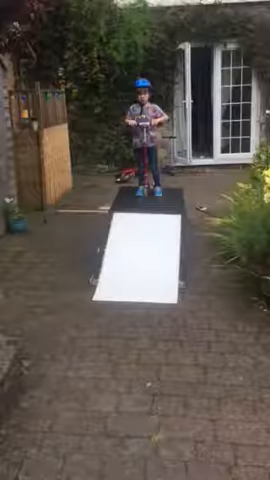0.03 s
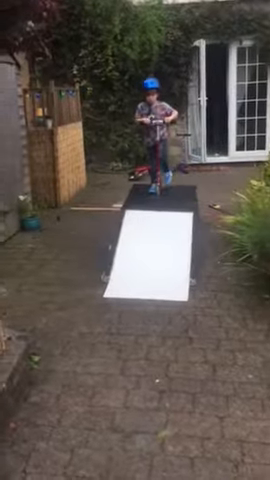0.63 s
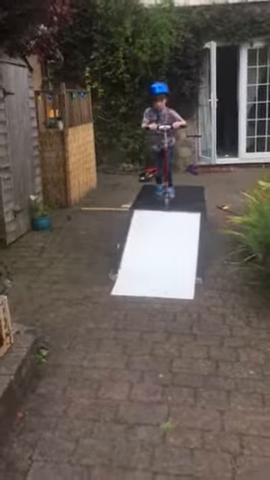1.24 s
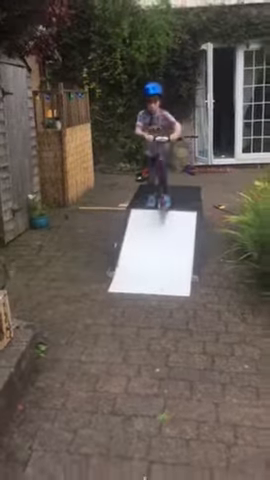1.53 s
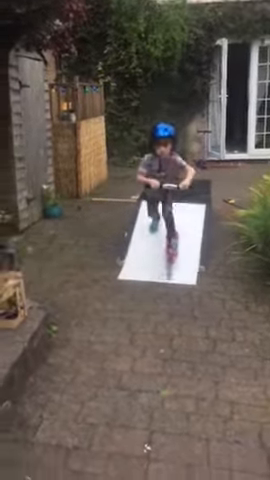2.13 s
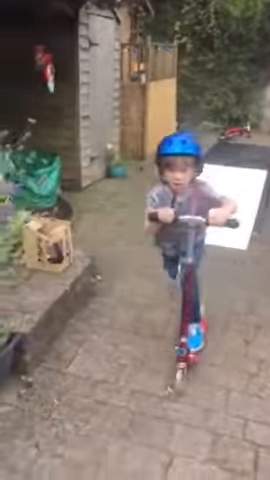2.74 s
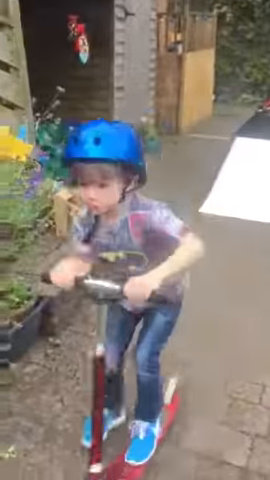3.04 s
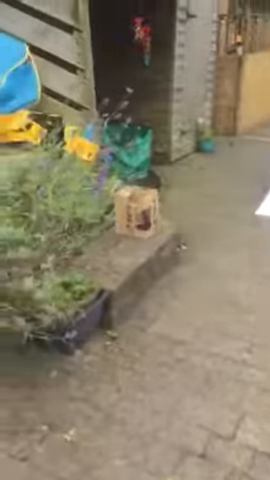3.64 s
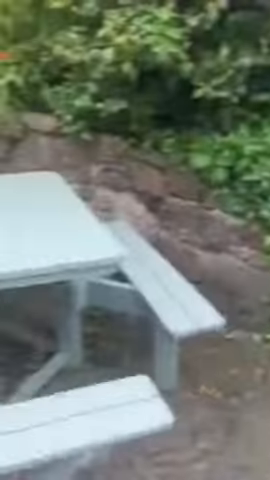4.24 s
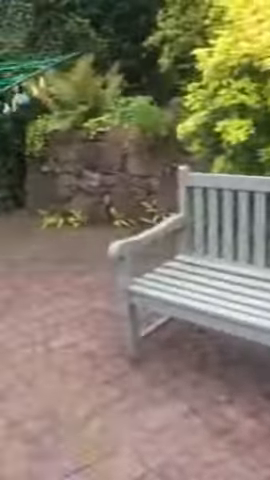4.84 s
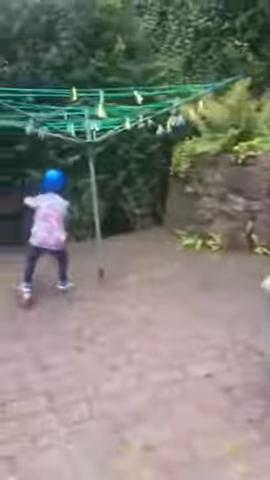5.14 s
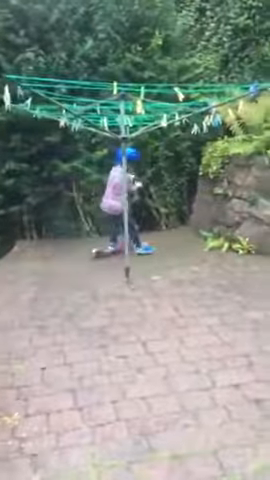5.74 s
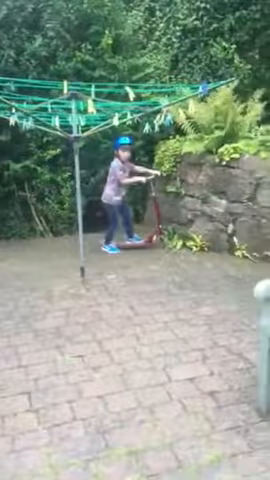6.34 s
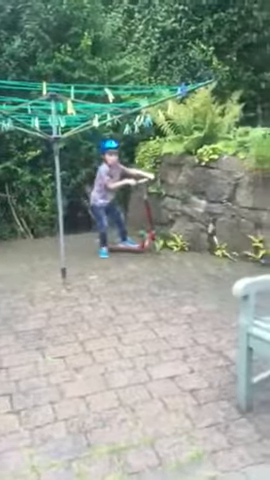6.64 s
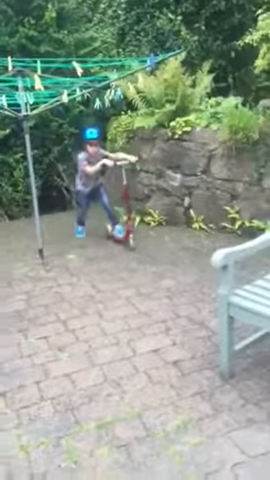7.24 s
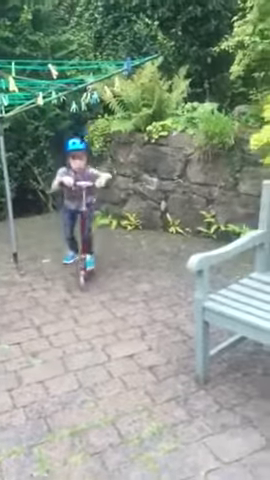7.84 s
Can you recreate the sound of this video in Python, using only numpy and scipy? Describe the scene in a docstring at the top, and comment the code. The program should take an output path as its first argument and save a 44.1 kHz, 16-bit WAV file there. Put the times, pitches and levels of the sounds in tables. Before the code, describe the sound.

A soft low thump opens over a light outdoor wind rumble. Around 1 second a kick scooter starts moving with faint shoe scuffs and a metallic clink. From about 1.5 to 2.3 seconds its wheels knock and boom on a hollow plywood ramp, hardest at 2 seconds. It then runs onto brick paving, clacking over the joints, its steel frame rattling and small hard wheels rumbling and crunching on grit. The clatter is loudest around 3.3 seconds, close to the microphone, then recedes with a scrape and dull deck thumps. A faint low hum rises and sinks from about 4.5 to 7 seconds. Near 6 seconds the scooter slows and turns with a soft skid and scuffs, almost going quiet. From about 7 seconds it sets off again with light clinks and a few rattling bumps until 8 seconds.

```python
"""A child's kick scooter rolls off a hollow plywood ramp, clatters close past over brick paving, turns
and sets off again. Each joint jolts the hollow deck and rattles the loose steel frame; the small hard
wheels rumble and crunch on grit, louder with speed and nearness. The steering tube and brake clink,
a shoe scuffs and the tread scrapes in the turns. Garden walls answer, a light wind and a low hum lie
underneath, and a soft low thump opens the scene."""
import sys
import numpy as np
from scipy import signal
from scipy.fft import rfft, irfft
from scipy.io import wavfile
from scipy.ndimage import uniform_filter1d, map_coordinates

SR = 44100
rng = np.random.default_rng(int(sys.argv[2]) if len(sys.argv) > 2 else 0)


def transcribe(signal):
    """Save signal, clipped to [-1, 1], as a 16-bit WAV file at the path in sys.argv[1]."""
    frames = np.atleast_2d(signal).T
    limited = np.clip(frames, -1, 1)
    pcm = np.round(limited * 32767).astype(np.int16)
    wavfile.write(sys.argv[1], SR, pcm)


N = 356769

# the scooter's path: (time [s], speed [m/s], distance from the listener [m])
RIDE = [(.7, 0.23, 6.8), (1.15, 1.1, 5.3), (1.37, 0.53, 6), (1.55, 2.86, 2.9), (2.199, 1.84, 2.8),
        (2.42, 3.03, 2.9), (3.05, 3.27, 1.34), (3.3, 1.7, 0.9), (3.549, 3.3, 1.68), (3.851, 2.7, 1.45),
        (4.5, 3.43, 2.48), (4.801, 2.3, 3.64), (5.3, 1.9, 3.9), (5.9, 1.15, 4.4), (6.7, 0.38, 3.17),
        (7.2, 0.99, 5.6), (7.58, 0.55, 4.3), (8.09, 0.95, 3.16)]
# wheels striking deep joints, and from about 5.1 s on, pushes of the foot jolting the frame: (time [s], clack
# [dB], rattle [dB], thud [dB])
HARD_JOLTS = [(2.307, -48, -47.5, -32.5), (2.424, -62, -46.5, -41), (2.509, -31.5, -35, -36.5),
              (2.682, -41, -44, -41.5), (2.798, -39, -41.5, -38.5), (2.838, -28.5, -31.5, -36.5),
              (2.883, -27.5, -32.5, -27.5), (2.942, -32, -34, -48), (3.082, -32, -37, -32),
              (3.127, -36.5, -36.5, -30.5), (3.171, -38.5, -38.5, -36.5), (3.224, -34.5, -35.5, -36),
              (3.251, -26, -28.5, -26.5), (3.302, -17.5, -23.5, -29.5), (3.317, -26, -39.5, -46),
              (3.35, -18, -22, -33), (3.393, -27.5, -31, -35), (3.443, -21.5, -25.0, -27),
              (3.547, -39.5, -42.5, -37.5), (3.654, -29, -35.5, -32), (3.743, -36, -40.0, -34.5),
              (3.789, -33, -45.5, -34), (3.932, -33.5, -41, -31), (4.096, -37.5, -57, -53),
              (4.132, -36, -44, -32), (4.236, -38.5, -45.5, -39), (4.284, -30.5, -38.5, -39),
              (4.4, -32.5, -46.5, -42), (4.491, -44, -43.5, -35), (4.509, -39, -43.5, -36),
              (4.597, -37, -44.5, -39), (4.666, -33, -39, -30.5), (4.803, -51, -53, -43),
              (4.917, -45, -45.5, -37), (5.142, -52, -53.5, -32.5), (5.388, -52, -50, -39.5),
              (5.728, -43.0, -44.5, -39.5), (5.936, -49, -51.5, -43), (6.018, -41.0, -44.5, -38.5),
              (6.644, -55, -56, -51), (7.824, -45.5, -47.5, -44), (8.003, -48, -50, -42)]
# blows on the ramp: (time [s], relative knock [dB], relative boom [dB], knock low-pass [Hz])
RAMP_HITS = [(1.473, -29.5, -37, 1270), (1.507, -24, -42, 1770), (1.533, -20, -40, 4870),
             (1.641, -27, -30, 900), (1.657, -22.5, -27, 2000), (1.78, -29, -48, 1700),
             (1.941, -26, -72, 1900), (2.032, -28, -48, 2000), (2.039, -12.5, -23, 3930),
             (2.331, -24, -20.5, 920)]
# dull thumps of the deck: (time [s], level [dB])
DECK_THUMPS = [(1.015, -50), (1.128, -46.5), (1.42, -39.5), (3.593, -31.5), (3.985, -32), (4.035, -42),
               (4.33, -34), (4.435, -38), (4.546, -37), (4.746, -37.5), (4.961, -36), (5.272, -34.5),
               (5.605, -36.5), (7.642, -47.5), (7.843, -45)]
# knocks of the steering tube: (time [s], relative level [dB], low-pass [Hz])
STEERING_KNOCKS = [(1.236, -28.5, 7500), (4.882, -23, 750), (7.203, -36.5, 1920), (7.765, -28.5, 7000)]
# clinks of the loose brake: (time [s], level [dB])
BRAKE_CLINKS = [(1.61, -60), (1.71, -53), (5.04, -57.5), (5.574, -55), (5.844, -52), (6.165, -55),
                (6.799, -58.5), (7.091, -52), (7.308, -59.5), (7.435, -57), (7.718, -53), (7.806, -46),
                (7.873, -51.5)]
# shoe soles dragging: (time [s], relative level [dB], length [s])
SCUFFS = [(0.777, -67, 0.15), (1.25, -58, 0.088), (1.501, -56, 0.13), (1.918, -48.5, 0.057),
          (4.098, -40.5, 0.031), (5.099, -57, 0.39), (4.938, -49.5, 0.067), (5.681, -53.5, 0.12),
          (6.322, -70.5, 0.39), (7.79, -65.5, 0.31)]
# wheels slipping sideways: (time [s], level [dB], length [s])
SKIDS = [(3.6, -43.5, 0.7), (5.761, -52, .42)]
# a low hum that rises and sinks: (time [s], pitch [Hz], level [dB])
HUM = [(4.3, 102, -90), (4.58, 106, -39), (5.15, 122, -44.5), (6.25, 130, -55.5), (6.68, 120, -47),
       (7.6, 100, -69)]
# the garden's reverb: (frequency [Hz], time to fall 60 dB [s])
GARDEN_DECAY = [(150, 0.35), (800, 0.11), (3000, 0.097), (14000, 0.14)]

# resonances of each part: (frequency [Hz], width [Hz], relative level [dB])
FRAME_MODES = [(946, 360, -4), (1320, 100, -11), (1527, 42, 0.5), (2026, 170, -11), (2710, 26, -8),
               (3230, 150, -8), (4075, 62, 0), (4565, 100, -2.5), (9140, 150, -6)]
DECK_MODES = [(105, 22, -2.5), (175, 24, 0)]
WHEEL_MODES = [(952, 90, -2), (1460, 120, -8.5), (2037, 200, -5.5), (3180, 960, -10.5)]
PLYWOOD_MODES = [(287.7, 14, 3), (540, 58, -12), (662, 30, 4.5), (2100, 160, 0.5)]
TUBE_MODES = [(1530, 240, 2), (2150, 70, -3), (3290, 74, 1), (6010, 80, 6.5)]
BRAKE_MODES = [(2700, 47, -6), (3400, 49, -2.5), (6630, 120, -2.5)]

# broad tone colour of each sound: (frequency [Hz], relative level [dB])
CLACK_EQ = [(150, -12), (400, -1.5), (680, -11), (900, 1.5), (1600, 1.5), (3300, 3.5), (4500, -11),
            (5400, -20.5), (9000, -24)]
RATTLE_EQ = [(2500, -19), (4900, -3.5), (6400, 6), (7600, -3.5), (8700, -1.5), (10400, -4), (15000, -2.5),
             (17500, -10)]
DECK_EQ = [(25, -51.5), (50, -17.5), (80, -3), (130, -3), (230, -2), (320, -9), (480, -19.5), (1000, -36.5),
           (5000, -71.5)]
TREAD_EQ = [(200, -6.5), (400, 0.5), (680, -3), (950, -5.5), (1300, 4.5), (2200, -1.5), (3400, -3),
            (5000, -16), (9000, -32.5)]
PLYWOOD_EQ = [(90, -18.5), (190, 2), (290, -0.5), (420, -9), (800, -12.5), (1400, -15), (3000, -24.5),
              (5500, -30.5), (9000, -65)]
BOOM_EQ = [(25, -65), (55, -5.5), (90, 5.5), (125, -1.5), (200, 2), (500, -49.5), (4000, -103)]
TUBE_EQ = [(150, 2), (600, 0.5), (1500, 0.5), (3700, -0.5), (4900, -11.5), (6500, -2), (7400, -16),
           (16000, 0.5)]
CLINK_EQ = [(700, -9.5), (2600, 2), (17000, -9)]
SOLE_EQ = [(250, -12.5), (650, 10.5), (1050, -3), (1400, 2), (2700, -2), (6500, -11), (16000, -25)]
WIND_EQ = [(20, -30), (50, 0.5), (90, -2), (280, -9), (450, -18), (800, -12), (1670, -23.5), (5000, -31.5),
           (17000, -38)]

# level laws: (level at 1 m/s and 1 m [dB], gain per tenfold speed [dB], loss per tenfold distance [dB])
RUMBLE_LAW, TREAD_LAW, RING_LAW = (-50, 26, 5.3), (-44, 14.7, 34), (-43, 15, 43.6)
GRIT_LAW, SEAM_LAW, CRACKLE_LAW = (-52, 20, 29.7), (-40, 17, 25), (-59, 32, 29)
RAMP_END_S = 2.3  # the wheels leave the plywood for the brick
TIME = np.arange(N) / SR


def hard_jolts():
    """A wheel drops into a joint, or a push of the foot jolts the frame: the frame clacks, loose steel rattles
    and the hollow deck thuds."""
    out = np.zeros(N)
    for s, clack_db, rattle_db, thud_db in HARD_JOLTS:
        _, metres = ride(s)
        chatter_s = .0019 + .0011 * metres  # scattering over the paving draws out distant blows
        shaded_eq = [(hz, db + leg_shadow(s) * (hz > 7300)) for hz, db in RATTLE_EQ]
        frame = body(CLACK_EQ, varied(FRAME_MODES, scatter_db=4), ring_db=11.5)
        steel = body(shaded_eq, varied(FRAME_MODES, scatter_db=3), ring_db=11)
        deck = body(DECK_EQ, varied(DECK_MODES, scatter_db=4, detune=.06))
        clack = blow(frame, chatter_s, settle_db=3.5, settle_s=.01, spread_db=5)
        rattle = blow(steel, chatter_s, settle_db=7, settle_s=.013, spread_db=6)
        thud = blow(deck, chatter_s=.0035, settle_db=-17, settle_s=.023, spread_db=1)
        add(out, s, amp(clack_db) * clack + amp(rattle_db) * rattle + amp(thud_db) * thud)
    return out


def seam_hits(brick_m=.21, scatter_m=.015, scatter_db=4.5):
    """One shallow joint per brick travelled, where no deep one falls: (time [s], level [dB])."""
    t = TIME[round(RAMP_END_S * SR):]
    speed, _ = ride(t)
    travel_m = np.cumsum(speed) / SR
    offset, depth = rng.standard_normal((120, 2)).T
    seam_m = brick_m * np.arange(1, len(offset) + 1) + scatter_m * offset
    deep_m = np.interp(np.transpose(HARD_JOLTS)[0], t, travel_m)
    gap_m = np.abs(seam_m[:, None] - deep_m).min(axis=1)
    struck = (gap_m > brick_m / 2) & (seam_m < travel_m[-1])
    times = np.interp(seam_m, travel_m, t)
    levels = loudness(SEAM_LAW, times) + scatter_db * depth
    return zip(times[struck], levels[struck])


def shallow_joints():
    """The shallow joints keep frame, wheels and deck pattering between the deep ones."""
    jolts = np.zeros(N)
    for s, db in seam_hits():
        add(jolts, s, amp([db]))
    shaking = through(jolts, np.exp(-TIME[:SR // 10] / .0023)) * grains(N, spread_db=7.5)
    wheel = body(CLACK_EQ, WHEEL_MODES, ring_db=13.5)
    steel = body(RATTLE_EQ, FRAME_MODES, ring_db=10)
    return through(shaking, wheel + amp(-24) * steel + amp(3) * body(DECK_EQ))


def rolling():
    """Rough brick shakes the deck, roars in the tread, rings the wheel and crunches with grit."""
    bumps = amp(2.5 * wobble(55))
    pebbles = ticks(rate=300, spread_db=4, fade_s=.002)
    knocks = ticks(rate=30, spread_db=2.5, fade_s=.012)
    speed, _ = ride(TIME)
    hopping = np.clip(speed / 3, 0, 1)  # slow wheels stay down, fast ones hop
    shaking = (1 - hopping + hopping * knocks) * rng.standard_normal(N)
    rumble = unit(through(shaking, body(DECK_EQ, DECK_MODES)))
    contact = np.sqrt(bumps) * (2 + pebbles) * grains(N, spread_db=3.5)
    tread = through(contact, body(TREAD_EQ, WHEEL_MODES[1:], ring_db=7.5))
    crunch = amp(4.5 * wobble(22)) * (1 + pebbles) * grains(N, spread_db=7)
    grit = through(crunch, body(RATTLE_EQ, FRAME_MODES, ring_db=-7.5))
    ring = wheel_ring(bumps * grains(N, spread_db=3.5))
    tread, grit = patchy(tread, depth_db=3.5), patchy(grit, depth_db=4)
    on_ramp = TIME < RAMP_END_S  # plywood is smoother, so it rolls more quietly
    rumble *= amp(loudness(RUMBLE_LAW, TIME) - 1.5 * on_ramp)
    tread *= amp(loudness(TREAD_LAW, TIME) - 4 * on_ramp)
    ring *= amp(loudness(RING_LAW, TIME))
    grit *= amp(loudness(GRIT_LAW, TIME) - 10.5 * on_ramp + leg_shadow(TIME))
    return rumble + tread + ring + grit


def wheel_ring(shaking):
    """The wheel's lowest resonance, a hollow ring whose pitch wanders with the load on it; rms 1."""
    hz, width, _ = min(WHEEL_MODES)
    swell = through(shaking, np.exp(-np.pi * width * TIME[:SR // 20]))
    pitch_hz = hz * (1 + .04 * wobble(11))
    return unit(swell * np.sin(2 * np.pi * np.cumsum(pitch_hz) / SR))


def ramp():
    """Wheels and feet knock on the plywood; the hollow booms and the frame rattles faintly just after."""
    out, hollow, steel = np.zeros(N), body(BOOM_EQ), body(RATTLE_EQ, FRAME_MODES, ring_db=13.5)
    for s, knock_db, boom_db, cutoff_hz in RAMP_HITS:
        board = body(PLYWOOD_EQ, varied(PLYWOOD_MODES, scatter_db=2), ring_db=4)
        knock = blow(dulled(board, cutoff_hz), chatter_s=.0012, settle_db=-3.5, settle_s=.025, spread_db=2)
        boom = blow(hollow, chatter_s=.0041, settle_db=-8.5, settle_s=.024, spread_db=-.5)
        rattle = blow(steel, chatter_s=.006, settle_db=-8, settle_s=.02, spread_db=4)
        add(out, s, amp(knock_db - 10) * knock + amp(boom_db - 5) * boom)
        add(out, s + .012, amp(-59) * rattle)
    return out


def deck_thumps():
    """The deck thumps dully as the rider's weight lands or a wheel sinks into a worn joint."""
    out, deck = np.zeros(N), body(DECK_EQ, DECK_MODES)
    for s, db in DECK_THUMPS:
        add(out, s, amp(db) * blow(deck, chatter_s=.004, settle_db=-3, settle_s=.012, spread_db=3))
    return out


def steering_knocks():
    """The steering tube knocks in its play as the rider pulls the bar: dull clunks and bright clinks."""
    out = np.zeros(N)
    for s, db, cutoff_hz in STEERING_KNOCKS:
        tube = dulled(body(TUBE_EQ, varied(TUBE_MODES, scatter_db=3), ring_db=11), cutoff_hz)
        knock = blow(tube, chatter_s=.0012, settle_db=9, settle_s=.0076, spread_db=10.5)
        add(out, s, amp(db - 13) * knock)
    return out


def brake_clinks():
    """The thin, loose brake blade chatters on its hinge and rings briefly."""
    out = np.zeros(N)
    for s, db in BRAKE_CLINKS:
        blade = body(CLINK_EQ, varied(BRAKE_MODES, scatter_db=3), ring_db=16)
        add(out, s, amp(db) * blow(blade, chatter_s=.0027, settle_db=1, settle_s=.018, spread_db=10.5))
    return out


def grit_crackle():
    """Single grains burst between brick and hard wheel: sharp, dry ticks at uneven moments."""
    pops = ticks(rate=70, spread_db=4.5, fade_s=.0006) * rng.standard_normal(N)
    level_db = loudness(CRACKLE_LAW, TIME) + leg_shadow(TIME)
    return amp(level_db) * (TIME > RAMP_END_S) * through(pops, body(CLINK_EQ))


def skids():
    """The tread scrapes sideways in a tight turn and softly rings the wheel."""
    out = np.zeros(N)
    for s, db, length_s in SKIDS:
        stroke = np.hanning(int(length_s * SR))
        add(out, s, amp(db) * stroke * grains(len(stroke), spread_db=4))
    grip = unit(amp(4 * wobble(20)))
    return through(out * grip, body(TREAD_EQ, WHEEL_MODES[1:3], ring_db=19))


def shoe_scuffs():
    """The pushing foot drags: a swell of tiny slips in the sole, with grit crunching under it."""
    out = np.zeros(N)
    for s, db, length_s in SCUFFS:
        stroke = np.sqrt(np.hanning(int(length_s * SR)))
        add(out, s, amp(db) * stroke * grains(len(stroke), spread_db=5.5))
    grip = amp(2.8 * wobble(90))
    grit = body(RATTLE_EQ, FRAME_MODES, ring_db=18.5)
    return through(out * grip, amp(3.5) * body(SOLE_EQ) + amp(-20.5) * grit)


def garden_reverb(x, predelay_s=.012):
    """Walls and hedges scatter a short tail that lingers longest in the bass."""
    hz, t, noise = signal.stft(rng.standard_normal(SR // 2), SR, nperseg=256)
    decay = amp(-60 * t / along(GARDEN_DECAY, hz)[:, None])
    tail = signal.istft(noise * decay, SR, nperseg=256)[1]
    return through(x, np.pad(tail / np.linalg.norm(tail), (int(predelay_s * SR), 0)))


def wind():
    """A bed of light wind and distant outdoor noise, swelling gently."""
    gusts = amp(wobble(1.8))
    return amp(-62) * gusts * through(rng.standard_normal(N), body(WIND_EQ))


def hum():
    """A low hum rises and sinks, fluttering more deeply while the scooter runs fast."""
    hum_hz, hum_db = curves(HUM, TIME)
    speed, _ = ride(TIME)
    dip_db = np.abs(3 * speed * wobble(20))
    phase = 2 * np.pi * np.cumsum(hum_hz + wobble(7.9)) / SR
    return amp(hum_db - dip_db) * np.sqrt(2) * np.sin(phase)


def opening_thump():
    """A soft low thump and a brief rustle as the sound cuts in."""
    out = np.zeros(N)
    thump = blow(body(BOOM_EQ), chatter_s=.003, settle_db=-14, settle_s=.012, spread_db=3)
    rustle = blow(body(SOLE_EQ), chatter_s=.001, settle_db=-5, settle_s=.025, spread_db=3)
    add(out, .083, amp(-43.5) * thump + amp(-53) * rustle)
    return out


def ride(s):
    """The scooter's speed [m/s] and distance [m] at time s."""
    return curves(RIDE, s)


def loudness(law, s):
    """Level [dB] at time s: faster is louder, farther is fainter."""
    db, per_speed, per_distance = law
    speed, metres = ride(s)
    return db + per_speed * np.log10(speed) - per_distance * np.log10(metres)


def leg_shadow(s, start_s=3.78, end_s=4.15, ease_s=.13):
    """Dip [dB] in grit and top-end rattle as the rider's legs hide the departing frame."""
    return -9.5 * np.clip(np.minimum(s - start_s, end_s - s) / ease_s, 0, 1)


def body(eq, modes=(), ring_db=0, size=8192):
    """Impulse response of energy 1: a broad tone colour with resonances standing out of it."""
    hz = np.fft.rfftfreq(size, 1 / SR)
    peaks = sum(amp(db + ring_db) ** 2 / (1 + (2 * (hz - f) / width) ** 2) for f, width, db in modes)
    magnitude = amp(along(eq, hz)) * np.sqrt(1 + peaks)
    cepstrum = irfft(np.log(magnitude))
    response = irfft(np.exp(rfft(2 * cepstrum[:size // 2], size)))  # minimum phase: a tight attack
    return response / np.linalg.norm(response)


def varied(modes, scatter_db, detune=.016):
    """Each blow lands elsewhere on a part under changing load: new strengths, slightly new pitches."""
    chance = rng.standard_normal((len(modes), 2))
    return [(hz * (1 + detune * bend), width, db + scatter_db * lift)
            for (hz, width, db), (bend, lift) in zip(modes, chance)]


def blow(response, chatter_s, settle_db, settle_s, spread_db):
    """A burst of contacts and a fading chatter as the parts settle; rms 1 over its first 20 ms."""
    t = TIME[:SR // 5]
    burst = t / chatter_s * np.exp(1 - t / chatter_s)
    settling = amp(settle_db) * np.exp(-t / settle_s) * (1 - np.exp(-t / chatter_s))
    sound = signal.fftconvolve((burst ** 2 + settling) * grains(len(t), spread_db), response)
    return sound / np.sqrt(np.mean(sound[:SR // 50] ** 2))


def grains(count, spread_db):
    """Dense tiny contacts of very uneven size; rms 1."""
    return unit(rng.standard_normal(count) * amp(spread_db * np.clip(rng.standard_normal(count), -2, 2)))


def ticks(rate, spread_db, fade_s):
    """Envelope of random jolts, about rate a second, each sudden and quickly fading."""
    hits = rng.random(N) < rate / SR
    strength = amp(spread_db * np.clip(rng.standard_normal(N), -2, 2))
    return unit(through(hits * strength, np.exp(-TIME[:SR // 20] / fade_s)))


def patchy(x, depth_db):
    """The contact point wanders, so resonances swell and fade in short patches; rms 1."""
    bands = signal.stft(x, nperseg=512)[2]
    patches = uniform_filter1d(rng.standard_normal(bands.shape), size=4, axis=0)  # across frequency
    patches = uniform_filter1d(patches, size=7, axis=1)  # across time
    return unit(signal.istft(bands * amp(depth_db * unit(patches)), nperseg=512)[1][:N])


def wobble(rate):
    """A smooth random curve, rate knots a second."""
    return map_coordinates(rng.standard_normal(int(N * rate / SR) + 4), [TIME * rate])


def curves(rows, s):
    """Each column of a timed table, interpolated at time s."""
    times, *columns = np.transpose(rows)
    return [np.interp(s, times, column) for column in columns]


def along(points, hz):
    """Read (frequency [Hz], value) points on a log frequency axis."""
    frequencies, values = np.transpose(points)
    return np.interp(np.log(hz + 1), np.log(frequencies + 1), values)


def dulled(x, cutoff_hz):
    """Roll off the top with a two-pole low-pass."""
    return signal.lfilter(*signal.butter(2, cutoff_hz, fs=SR), x)


def through(x, response):
    """Play x through an impulse response."""
    return signal.fftconvolve(x, response)[:N]


def add(track, s, sound):
    """Mix a sound in at time s."""
    part = track[round(s * SR):][:len(sound)]
    part += sound[:len(part)]


def amp(db):
    """Decibels to gain."""
    return 10 ** (np.asarray(db) / 20)


def unit(x):
    """Scale to rms 1."""
    return x / np.sqrt(np.mean(x ** 2) + 1e-20)


def scene():
    """The mono mix: the farther the scooter, the larger the share of garden reverb."""
    scooter = hard_jolts() + shallow_joints() + ramp() + deck_thumps() + steering_knocks()
    scooter += brake_clinks() + shoe_scuffs() + skids() + rolling() + grit_crackle()
    _, metres = ride(TIME)
    reverb = amp(-19.5) * garden_reverb(scooter * metres ** .7)
    return (scooter + reverb + wind() + hum() + opening_thump())[None]


def record(dry, start_s=.082, top_hz=17400):
    """The sound cuts in after a moment of silence and holds nothing above top_hz."""
    gated = dry * (TIME > start_s)
    passband = np.fft.rfftfreq(N, 1 / SR) < top_hz
    return irfft(rfft(gated) * passband, N)


dry = scene()
out = record(dry)
transcribe(out)
```